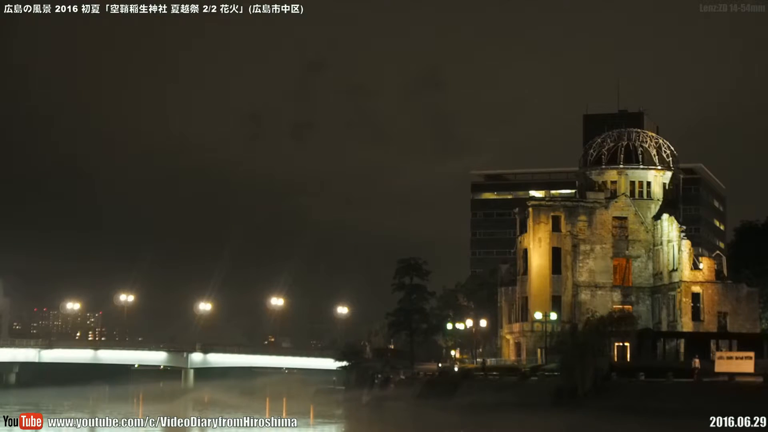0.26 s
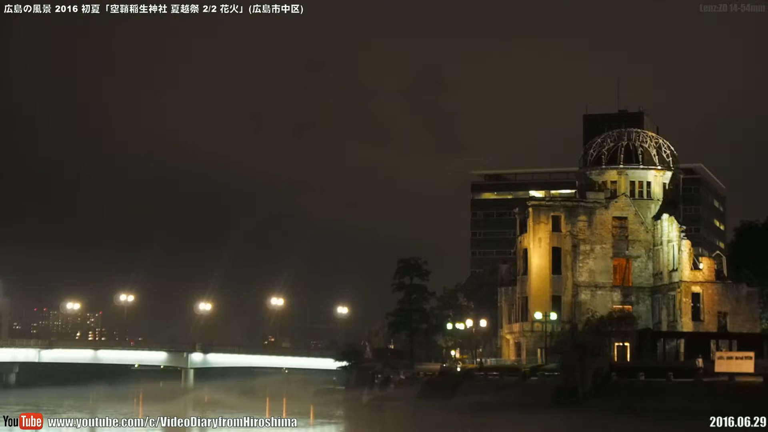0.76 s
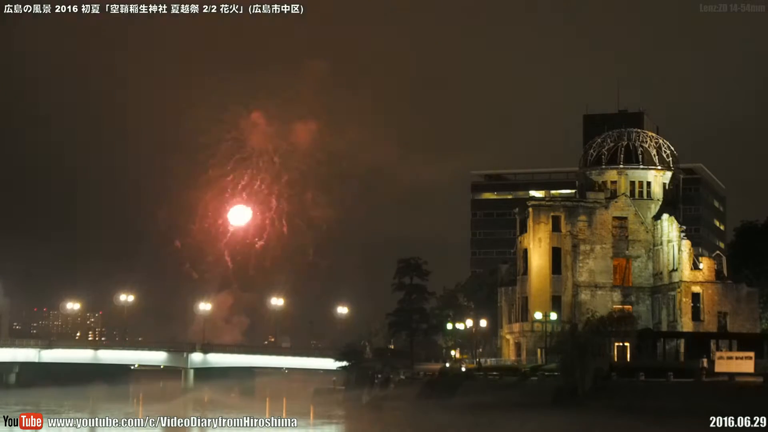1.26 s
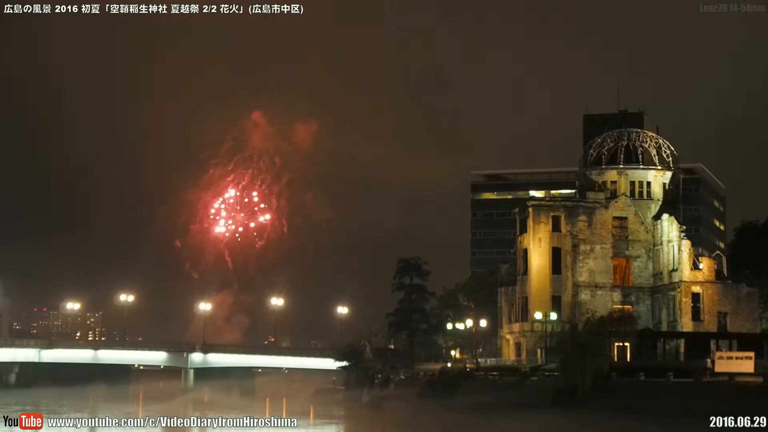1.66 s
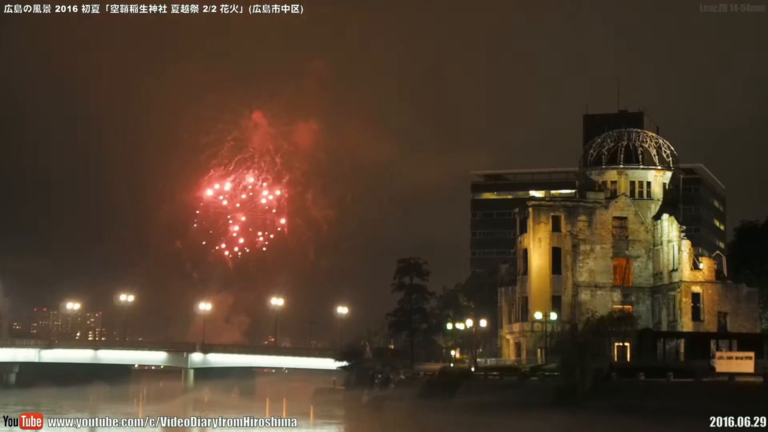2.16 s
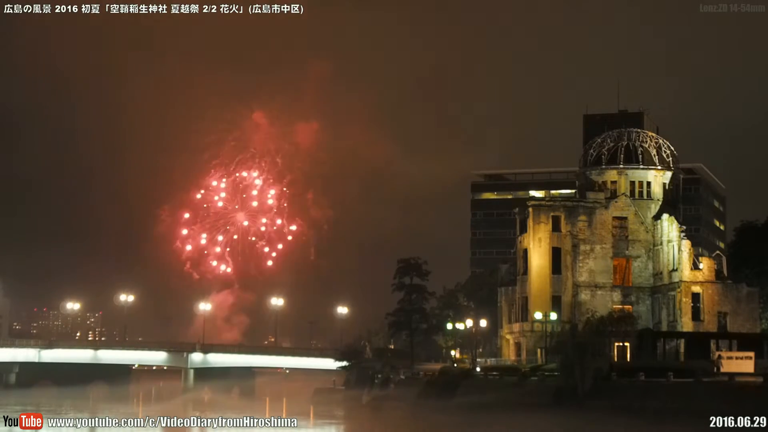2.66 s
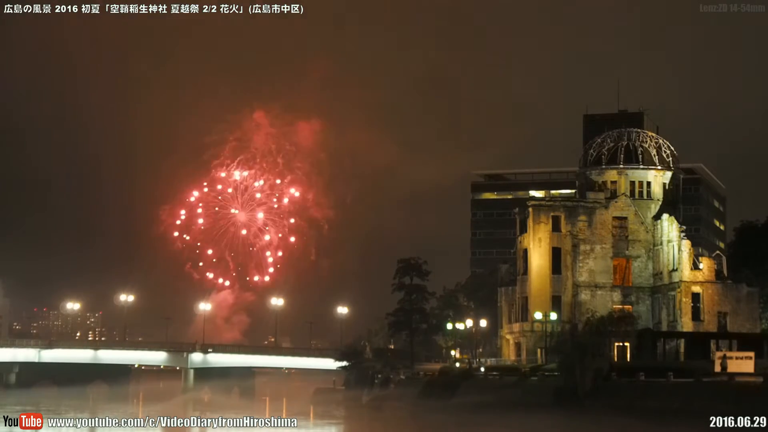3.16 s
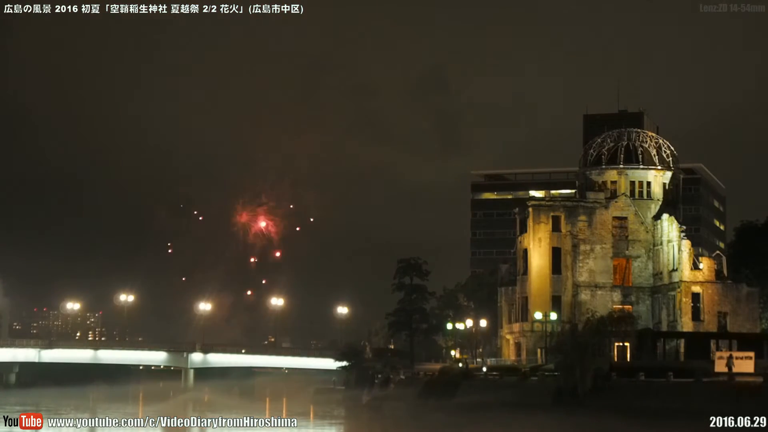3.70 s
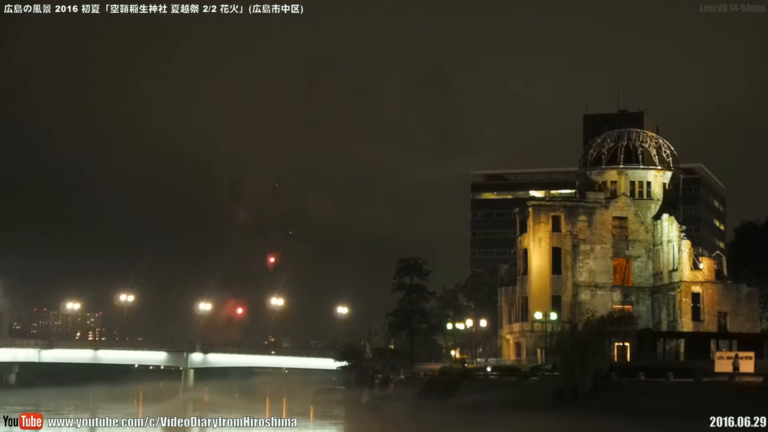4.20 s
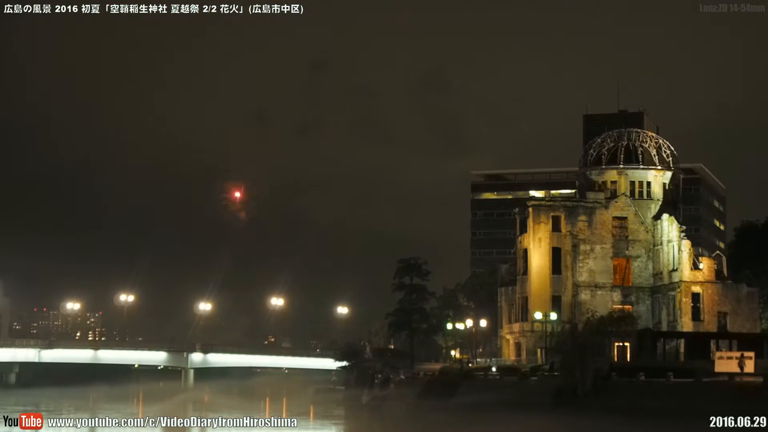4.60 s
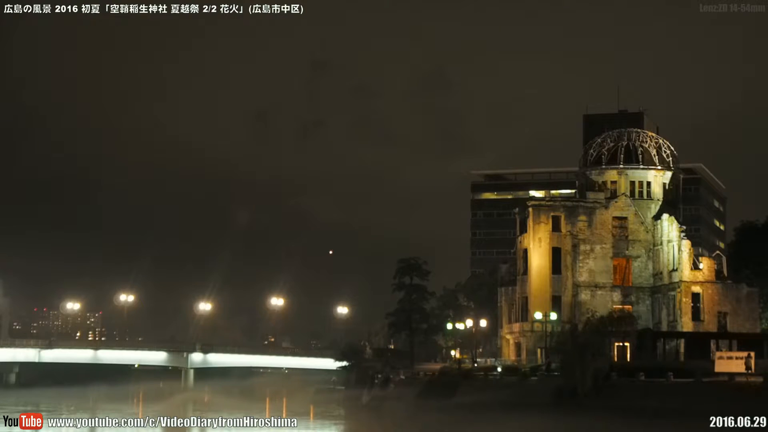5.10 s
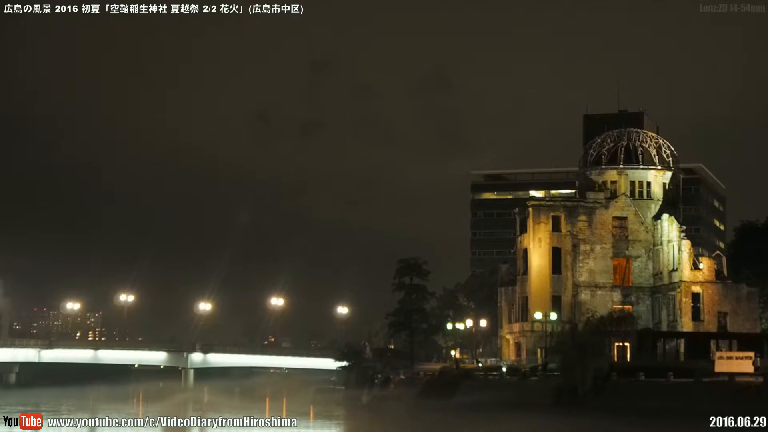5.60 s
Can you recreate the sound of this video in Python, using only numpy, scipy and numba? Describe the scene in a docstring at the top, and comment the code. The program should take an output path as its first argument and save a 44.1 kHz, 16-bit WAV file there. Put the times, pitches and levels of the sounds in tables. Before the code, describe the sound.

A distant firework launches with a low thump, then bursts with one sharp, echoing bang over city traffic rumble and a throbbing engine.

```python
"""By a city river at night, one microphone feeding two hissing channels.
A slow engine throbs over traffic rumble. At 0.4 s a firework is launched with a low thump; the
engine swells, then recedes as it speeds up, and a faint squeal passes at 2.5 s. At 3.7 s the shell
bursts far off over the water: its pressure wave clips the channels and ducks their gain, and the
echoes roll back from the city blocks."""
import sys
import numpy as np
from scipy import signal
from scipy.io import wavfile
from scipy.ndimage import uniform_filter1d
from numba import njit

SR = 44100
rng = np.random.default_rng(int(sys.argv[2]) if len(sys.argv) > 2 else 0)


def pcm_store(signal):
    """Save signal as 16-bit PCM."""
    levels = np.round(np.clip(np.atleast_2d(signal), -1, 1) * 32767)
    wavfile.write(sys.argv[1], SR, levels.astype(np.int16).T)


N = 257984


def blast(length_s=.00229, skew=.77, low_hz=99, high_hz=5000):
    """A sharp pressure jump, then a longer suction, with a softened front and no deep bass."""
    progress = np.clip(np.arange(2048) / SR / length_s, 0, 1)
    wave = lowpass(np.cos(3 * np.pi / 2 * progress ** skew), high_hz)
    return signal.sosfilt(signal.butter(2, low_hz, "high", fs=SR, output="sos"), wave)


# Pulses of the bang, then its echoes, at the microphone: t/s, level/dB before dulling, cut-off f/Hz
PULSES = [(3.70138, 4.6, 3800), (3.70315, 4.9, 410), (3.70366, -12, 6000), (3.70638, -.3, 530),
          (3.70672, -15, 4000), (3.70792, -5, 280), (3.71367, -.3, 208), (3.71713, -14.6, 720),
          (3.739, -16, 450), (3.744, -18, 600), (3.7635, -14, 350), (3.8665, -26, 2600),
          (3.8715, -22, 2600), (4.615, -28, 270), (4.862, -32, 340), (5.1115, -36, 240)]


def burst():
    """A quick cluster of sharp and dull pulses forms the bang; single duller echoes follow."""
    out, wave = np.zeros(N), blast()
    for s, db, hz in PULSES:
        out[int(s * SR):][:len(wave)] += undb(db) * lowpass(wave, hz)
    return out


def trails(grains, t, t60=.55, width_share=.6, trail_db=-14.5):
    """Scatter trails each pulse; the later it comes, the stronger its trail, growing with the square of its
    delay."""
    out = 0
    for s, db, hz in PULSES:
        delay_s = s - PULSES[0][0]
        ring = level(resonate(grains, hz, width_share * hz), 0)
        out += ring * delay_s ** 2 * fade(t - delay_s, t60, db + trail_db)
    return out


# Echoes from near, middle and far blocks: 60 dB decay t/s, level/dB
BLOCK_ECHOES = [(.8, -22.5), (3.2, -34.5), (30, -47)]


def roll(grains, t, rise_s=.018, air_hz=550):
    """Countless reflections of the blast off the city merge into a long dull roll."""
    power = sum(fade(t, t60, db) ** 2 for t60, db in BLOCK_ECHOES)
    rise = np.clip(t / rise_s, 0, 1)
    echoes = level(signal.fftconvolve(grains, blast())[:N], 0)
    return lowpass(echoes, air_hz, damping=1.58) * np.sqrt(power) * rise


# Scatter from close to the microphone: centre f/Hz, width f/Hz, 60 dB decay t/s, level/dB
NEAR_SCATTER = [(2420, 560, 0.055, -25), (1450, 1120, 0.73, -36), (2580, 2400, 0.41, -48),
                (4600, 2000, .4, -73)]


def splash(grains, t):
    """Near surfaces throw back a short bright spray of the blast."""
    return sum(level(resonate(grains, hz, width), 0) * fade(t, t60, db)
               for hz, width, t60, db in NEAR_SCATTER)


def scatter(rough_db=2.5):
    """Small reflections from near and far: rough noise shaped by the time t since the bang."""
    t = np.arange(N) / SR - PULSES[0][0]
    grains = rng.standard_normal(N) * undb(rough_db * walk(60))
    return roll(grains, t) + trails(grains, t) + splash(grains, t)


def launch(at_s=.386, hz=68, width_hz=55, peak_db=-27):
    """One push of air, heard as a low thump."""
    push = np.zeros(N)
    push[int(at_s * SR)] = 1
    ring = resonate(push, hz, width_hz)
    return undb(peak_db) * ring / np.abs(ring).max()


# Engine speed, sagging and then rising: t/s, firing f/Hz
FIRING_RATE = [(0, 17.876), (1.94, 17.62), (3.98, 19.02), (5.85, 21.07)]
# Exhaust resonances: centre f/Hz, width f/Hz, relative level/dB
EXHAUST_MODES = [(38, 14, -7), (118, 78, 0), (240, 50, -15)]
# The engine as heard at the microphone: t/s, level/dB
ENGINE_LEVEL = [(0, -48.5), (.9, -46), (1.12, -40), (1.9, -42), (2.85, -40), (3.5, -46.5), (5.85, -53.5)]


def engine(start_turn=.436, uneven_db=1.5, jitter_s=.0005):
    """Slow, slightly uneven firings, each a short puff ringing the exhaust."""
    turns = start_turn + np.cumsum(curve(FIRING_RATE)) / SR
    firings = np.flatnonzero(np.diff(np.floor(turns)))
    timing, strength = rng.standard_normal((len(firings), 2)).T
    firings += (jitter_s * SR * timing).astype(int)
    pulses = np.zeros(N)
    pulses[np.clip(firings, 0, N - 1)] = -undb(uneven_db * strength)
    puffs = lowpass(pulses, hz=150, damping=1.2)  # gas leaves as a soft puff, not a click
    ring = sum(level(resonate(puffs, hz, width), db) for hz, width, db in EXHAUST_MODES)
    return level(ring, 0) * undb(curve(ENGINE_LEVEL))


def squeal(start_s=2.42, top_s=2.5, end_s=2.65, fade_s=.025, top_hz=1090, db=-58.5):
    """A faint thin tone rises and sinks."""
    t = np.arange(N) / SR
    hz = top_hz - np.maximum(1500 * (top_s - t), 750 * (t - top_s))  # rise and sag in Hz per second
    gate = np.clip(np.minimum(t - start_s, end_s - t) / fade_s, 0, 1) ** 2
    return np.sqrt(2) * gate * undb(db) * np.sin(2 * np.pi * np.cumsum(hz) / SR)


# Heavy traffic coming and going, at the microphone: t/s, level/dB
DRONE_LEVEL = [(0, -43.5), (.4, -51.5), (3, -49.5), (3.4, -45), (4.2, -55.5), (4.8, -45.5), (5.85, -47)]


def drone(hz=125, width_hz=70):
    """A band of low engine noise from passing heavy vehicles."""
    return level(resonate(rng.standard_normal(N), hz, width_hz), 0) * undb(curve(DRONE_LEVEL))


# Traffic spectrum at the river: f/Hz, relative density level/dB
TRAFFIC_SPECTRUM = [(12, -8), (22, 0.5), (40, -7.5), (70, -5), (100, -13), (140, -15), (185, -17),
                    (240, -12.5), (320, -24.5), (480, -28), (1000, -26), (1500, -33.5), (2100, -37),
                    (4000, -42.5), (8000, -47)]


def traffic(db=-43, flicker_db=.96, flicker_hz=4.89):
    """The city's traffic rumbles, each third-octave band flickering on its own."""
    out = 0
    knots_hz, knots_db = np.transpose(TRAFFIC_SPECTRUM)
    for hz in 12 * 2 ** np.arange(0, 9.5, 1 / 3):
        band_db = np.interp(np.log(hz), np.log(knots_hz), knots_db) - flicker_db * walk(flicker_hz)
        out += undb(band_db) * resonate(rng.standard_normal(N), hz, hz / 3)
    return level(out, db)


def undb(db):
    """dB to gain."""
    return 10 ** (np.asarray(db) / 20)


def level(x, db):
    """Scale to an rms level."""
    return x * undb(db) / np.sqrt(np.mean(x ** 2))


def curve(table):
    """A table of times and values, interpolated sample by sample."""
    return np.interp(np.arange(N) / SR, *np.transpose(table))


def fade(after_s, t60, db):
    """Starts at a level when after_s passes zero and dies away."""
    return (after_s > 0) * undb(db - 60 * np.maximum(after_s, 0) / t60)


def walk(rate):
    """Random values held 1 / rate seconds and smoothed twice."""
    hold = int(SR / rate)
    steps = np.repeat(rng.standard_normal(N // hold + 1), hold)
    return uniform_filter1d(uniform_filter1d(steps, hold), hold)[:N]


@njit
def svf(x, hz, damping):
    """State-variable filter: rows low-pass, band-pass."""
    out, band_state, low_state = np.empty((2, len(x))), 0., 0.
    g = np.tan(np.pi * hz / SR)
    for i in range(len(x)):
        band = (band_state + g * (x[i] - low_state)) / (1 + g * (g + damping))
        out[0, i], out[1, i] = low_state + g * band, damping * band
        band_state, low_state = 2 * band - band_state, low_state + 2 * g * band
    return out


def lowpass(x, hz, damping=1.6):
    """Dull the sound above hz."""
    return svf(x, hz, damping)[0]


def resonate(x, hz, width_hz):
    """Two like band-passes in series."""
    once = svf(x, hz, width_hz / hz)[1]
    return svf(once, hz, width_hz / hz)[1]


def scene():
    """Firework, engine and city reach one microphone, the same on both channels."""
    microphone = traffic() + drone() + engine() + launch() + squeal() + burst() + scatter()
    return np.tile(microphone, (2, 1))


@njit
def duck_db(x, threshold=.15, depth_db=6.03, attack_s=.003, hold_s=.25, release_db_per_s=10.5):
    """Overloads pull the gain down; it holds, then climbs back at a steady rate."""
    out, cut, wait = np.empty(len(x)), 0., 0.
    for i in range(len(x)):
        if abs(x[i]) > threshold:
            cut += (depth_db - cut) / (attack_s * SR)
            wait = hold_s * SR
        elif wait > 0:
            wait -= 1
        else:
            cut = max(cut - release_db_per_s / SR, 0.)
        out[i] = -cut
    return out


def record(dry, hiss_db=-58.5, flutter_db=-71, whine_db=-88, dc_offset=.0016, top_hz=15750):
    """The amplifiers add hiss, low flutter and whine; the gain ducks, peaks clip, the top is cut."""
    t = np.arange(N) / SR
    shared, own = rng.standard_normal(N), rng.standard_normal((2, N))
    hiss = undb(hiss_db) * (own + .75 * shared)
    flutter = np.array([level(resonate(noise, hz=28, width_hz=22), flutter_db)
                        for noise in rng.standard_normal((2, N))])
    whine = undb(whine_db) * sum(np.sin(2 * np.pi * hz * t) for hz in (12000, 13000, 14000, 15000))
    channels = dry + hiss + flutter + whine
    gain = undb(duck_db(channels[0]))  # the left channel steers both
    clipped = np.clip(channels * gain + dc_offset, -1, 1)
    return signal.sosfilt(signal.ellip(12, .1, 75, top_hz, fs=SR, output="sos"), clipped)


dry = scene()
out = record(dry)
pcm_store(out)
```